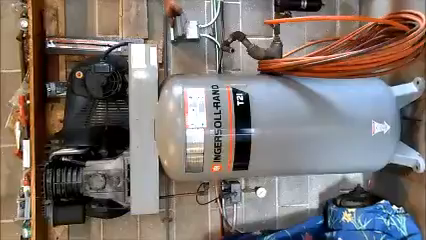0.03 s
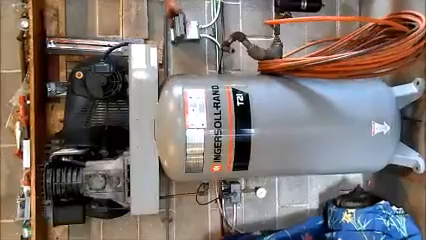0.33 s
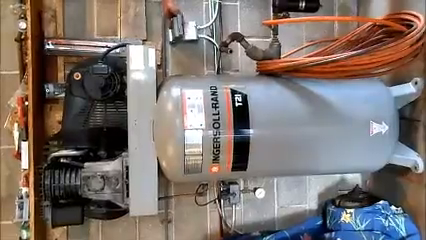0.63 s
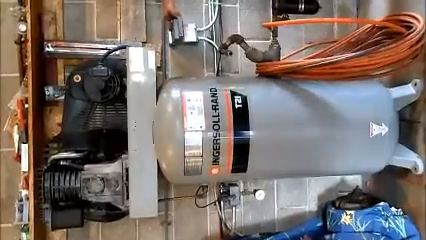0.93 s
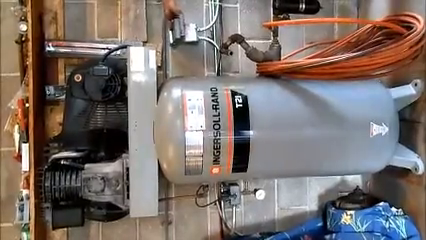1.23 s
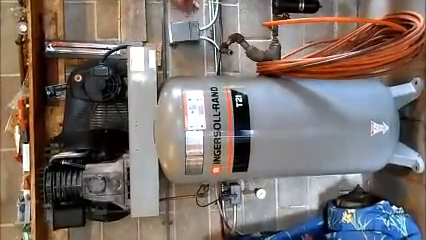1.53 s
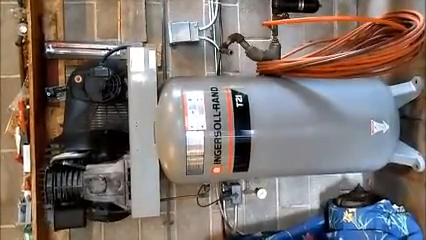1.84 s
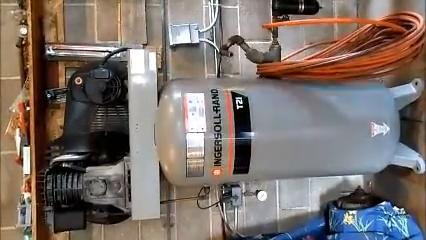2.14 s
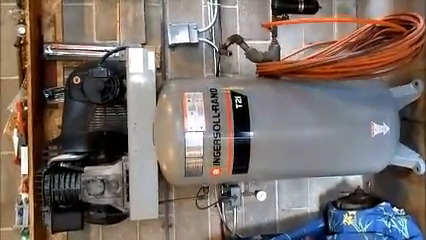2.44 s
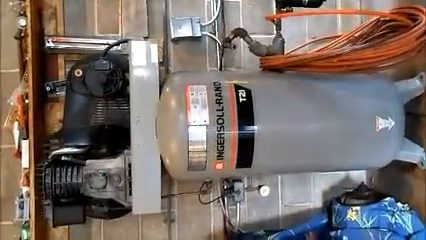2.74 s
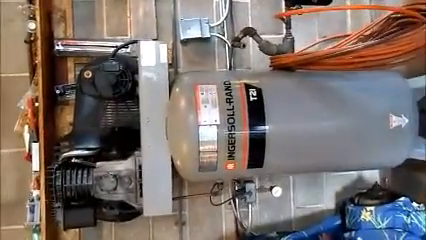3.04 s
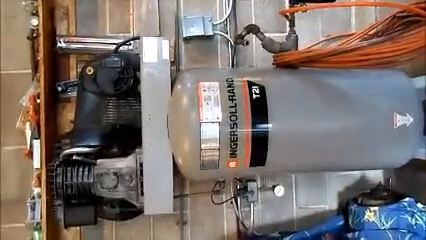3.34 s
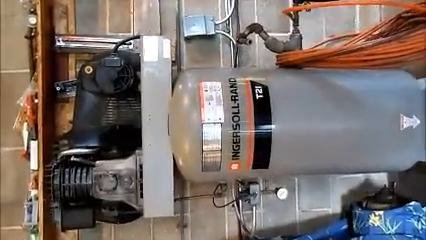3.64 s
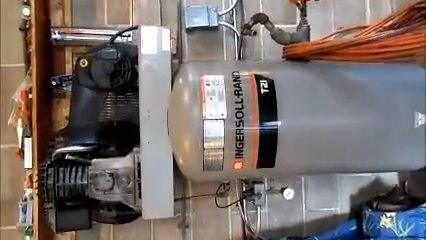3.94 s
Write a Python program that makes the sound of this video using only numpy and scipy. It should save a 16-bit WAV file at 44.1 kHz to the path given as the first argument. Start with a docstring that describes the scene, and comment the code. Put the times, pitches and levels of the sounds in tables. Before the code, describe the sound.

An air compressor kicks in after near silence and a sharp switch clack in a small workshop. A metal lid drops shut and bounces once while the machine runs on with a steady rumble, fast thumping and rattling hiss.

```python
"""A belt-driven piston air compressor starts up in a small workshop.
A hand fumbles at the switch box, the switch clacks, and motor and belt groan as they take the load.
The pump settles to about twenty turns a second: pistons thump, valves puff, parts clatter, air rushes
and the tank rings over the motor's hum. The metal lid of the switch box drops shut and bounces once."""
import sys
import numpy as np
from scipy import signal
from scipy.fft import rfft, irfft
from scipy.io import wavfile
from scipy.ndimage import uniform_filter1d

SR = 44100
rng = np.random.default_rng(int(sys.argv[2]) if len(sys.argv) > 2 else 0)


def to_wav(s):
    """Save 16-bit WAV."""
    ch = np.atleast_2d(s).T  # columns
    pcm = np.round(np.clip(ch, -1, 1) * 32767)  # PCM
    wavfile.write(sys.argv[1], SR, pcm.astype(np.int16))


N = 176400
T = np.arange(N) / SR
CRANK_HZ, MAINS_HZ = 19.725, 60  # turns of the pump's crank; cycles of the electric supply
OPEN_S = 0.44  # near silence until here


def pump(turns, on_s=1.234):
    """All the sounds of the pump fade in together; turns counts the turns of its crank."""
    parts = clatter() + air_rush(turns) + tank() + thump(turns) + valves(turns)
    return ramp(on_s, 0.07) * parts


def thump(turns):
    """The pistons push out pulses of pressure: low tones at multiples of the crank rate."""
    tones = [(1, -30), (2, -25.5), (4, -28), (5, -36.5), (6, -28.5), (7, -28.5), (8, -26.5), (9, -29.5),
             (10, -29.5), (11, -31.5), (13, -31.5), (14, -36.5), (15, -34), (16, -38.5), (17, -39.5),
             (32, -39), (35, -42.5)]  # tones in the pulses: crank_multiple, level_db
    loudness = [(1.35, 1.5), (1.85, -2.5), (2.15, 0.5), (2.95, -0.5), (3.32, 1.3), (3.55, -0.5),
                (3.95, 0.5)]  # strength of the pulses: time_s, level_db
    out = np.zeros(N)
    for multiple, db in tones:
        strength = amp(db) * (1 + 0.088 * wander(rate_hz=5.4))
        smear = 1.13 * rng.uniform(-np.pi / 2, np.pi / 2)  # tank and room put the tones out of step
        out += strength * np.sqrt(2) * np.cos(2 * np.pi * multiple * turns + smear)
    return level(loudness) * out


def valves(turns, fall_hz_per_s=6700):
    """Each valve rings or puffs at its own place in the turn, never twice equally hard."""
    # clean rings of the air intake: delay_s, length_s, pitch_hz, level_db
    rings = [(0.0042, 0.0024, 1166, -22.5), (0.009, 0.0035, 1140, -32), (.017, 0.0054, 1033, -28)]
    # rough puffs of the valves: delay_s, length_s, pitch_hz, width_hz, level_db
    puffs = [(0.01, 0.0043, 460, 340, -35), (0.032, 0.014, 696, 130, -37.5),
             (0.0078, 0.0088, 1700, 1100, -38), (0.0093, 0.0043, 8920, 1100, -53.5),
             (0.043, 0.0092, 5800, 6200, -49.5)]
    unloaded = 1 - ramp(1.31, 0.16)  # the intake gulps harder until the pump works against pressure
    out = np.zeros(N)
    for delay, length, hz, db in rings:
        t = since(turns, delay)
        strength = amp(db + 5 * unloaded + 1.43 * wander(rate_hz=35))
        phase = 2 * np.pi * (hz - fall_hz_per_s * t / 2) * t + 0.35 * wander(rate_hz=120)
        out += strength * pulse(turns, delay, length) * np.sqrt(2) * np.cos(phase)
    for delay, length, hz, width_hz, db in puffs:
        puff = machine_noise(repeat=0.79) * pulse(turns, delay, length)
        out += amp(db) * band(puff, hz, width_hz)
    knocks = band(noise() * pulse(turns, delay_s=0, length_s=0.005), hz=480, width_hz=350)
    return out + amp(-28) * unloaded * knocks


def clatter():
    """Pump and belt clatter steadily, much alike in every turn."""
    spectrum = [(20, -12), (130, 0.5), (240, -3.5), (340, -4), (490, -0.5), (660, -3.5), (800, -8),
                (1300, -7.5), (1600, -21), (3000, -37.5)]  # tone of the clatter: pitch_hz, level_db
    return amp(-25.5) * colour(machine_noise(repeat=0.56), spectrum)


def air_rush(turns, ring_share=0.61):
    """Air rushes from the pump and rings in the room, and swells once a turn, so it rattles."""
    spectrum = [(820, -36), (1400, -0.5), (1900, 1), (2400, -2), (3050, 0), (3740, -7.5), (4550, -4.5),
                (4950, -10), (5330, -8), (6200, -19.5), (7740, -17), (8290, -21.5), (9030, -23.5),
                (10100, -21), (10800, -57)]  # tone of the rushing air: pitch_hz, level_db
    loudness = [(1.2, -24), (1.3, -34), (1.42, -38.5), (1.55, -32.5), (1.7, -32.5), (1.9, -32.5),
                (2.1, -29), (2.5, -30.5), (2.9, -31), (3.2, -28.5), (3.45, -31.5), (3.65, -27.5),
                (3.8, -31.5), (4, -30.5)]  # strength of the rush: time_s, level_db
    ring = echoes(noise())
    rough = unit(machine_noise(repeat=0.17) * amp(1.9 * wander(rate_hz=340)))
    rush = np.sqrt(ring_share) * ring + np.sqrt(1 - ring_share) * rough
    swell_db = 3.5 * pulse(turns, delay_s=0.04, length_s=0.015)
    rattle = unit(amp(swell_db + 0.58 * wander(rate_hz=32)))
    return level(loudness) * rattle * colour(rush, spectrum)


def tank(pitch_hz=520.5):
    """The air tank rings on one wavering note."""
    loudness = [(1.3, -35.5), (2.25, -39.5), (2.55, -28.5), (2.85, -29.5), (3.05, -35), (3.3, -33),
                (3.6, -30.5), (4, -33)]  # strength of the ring: time_s, level_db
    tone = np.sqrt(2) * np.sin(2 * np.pi * pitch_hz * T + 0.13 * wander(rate_hz=5.9))
    flutter = amp(-0.5 + 2.4 * wander(rate_hz=24))
    return level(loudness) * tone * flutter


def motor(turns, start_s=1.235, settle_s=1.445):
    """The starting current makes a ragged buzz, which gives way to a hum that throbs with the load."""
    tones = [(1, -31, 0.06), (2, -30, 0.18), (3, -32.5, 0.27), (4, -21.5, 0.36)]  # tones of the motor's hum: mains_multiple, level_db, throb_share
    running = ramp(settle_s, 0.086)
    mains_phase = 2 * np.pi * MAINS_HZ * (T - start_s)
    load = np.cos(2 * np.pi * (turns - 0.65))
    hum = np.zeros(N)
    for multiple, db, throb in tones:
        tone = np.sqrt(2) * np.sin(multiple * mains_phase + 0.05 * wander(rate_hz=23))
        hum += amp(db) * tone * (1 + throb * load)
    growl = 1 + 0.3 * wander(rate_hz=170)
    surge = amp(-20) * np.sqrt(2) * np.sin(2 * mains_phase) * growl
    return ramp(start_s, 0.014) * (hum * (0.25 + 0.71 * running) + surge * (1 - running))


def groans():
    """Motor and belt shudder as they take up the load; each groan swells and dies away."""
    # groans of motor and belt: start_s, rise_s, fade_s, pitch_hz, width_hz, level_db
    shudders = [(1.160, 0.03, 0.15, 252, 24, -11.5), (1.163, 0.049, 0.14, 572, 210, -13.5),
                (1.163, 0.011, 0.72, 403, 147, -17.5), (1.18, 0.031, 0.27, 1130, 400, -20.5),
                (1.17, 0.029, 0.4, 2300, 1700, -20.5), (1.158, 0.087, 0.35, 167, 210, -15.5),
                (1.16, 0.18, .25, 60, 14, -26)]
    out = np.zeros(N)
    for start, rise, fade, hz, width_hz, db in shudders:
        faded_db = 60 * np.maximum(T - start - rise, 0) / fade
        out += amp(db - faded_db) * ramp(start, rise) * rough_tone(hz, width_hz)
    return out


def switch():
    """A hand touches the box, then switch and starter clack sharply, with a tail from the room."""
    # touches of the hand: start_s, level_db, pitch_hz, width_hz, fade_s
    touches = [(0.732, -45, 701, 50, 0.15), (.729, -51.5, 1328, 160, 0.08), (.975, -49, 720, 350, .15),
               (1.104, -51.5, 1800, 1800, 0.2), (1.137, -38, 3300, 3020, 0.16),
               (1.145, -22.5, 3480, 920, 0.085), (1.145, -30, 5800, 1510, .08)]
    clacks = [(1.153, -11.5), (1.197, -24), (1.272, -25), (1.562, -30.5)]  # blows of switch and starter: start_s, level_db
    spectrum = [(200, -11), (700, 0), (1070, 9.5), (1500, -1), (3500, 0.5), (4500, -2.5), (5600, -2),
                (7700, -1.5), (10500, -9)]  # tone of a clack: pitch_hz, level_db
    hand = sum(amp(db) * strike(start, fade, rise_s=0.0032) * rough_tone(hz, width_hz)
               for start, db, hz, width_hz, fade in touches)
    blows = np.zeros(N)
    for start, db in clacks:
        tail = amp(-8) * strike(start, fade_s=0.27)
        blows += amp(db) * (strike(start, fade_s=0.063, rise_s=0.007) + tail)
    return hand + blows * colour(noise(), spectrum)


def lid():
    """The metal lid cracks against its box and rings unevenly; the room answers."""
    hits = [(1.702, -2), (1.979, -17)]  # the drop and the bounce: start_s, level_db
    notes = [(1280, -3.5, 0.16), (1350, 2, 0.15), (2089, -12, 0.2), (2280, -1.5, 0.085), (2385, -2, 0.21),
             (2955, -9, 0.17), (3720, -6, .07), (3790, -5, 0.17), (4440, -15, 0.39), (5480, -19, 0.22),
             (6550, -14, 0.074), (7154, -24, 0.22), (9800, -14, 0.11)]  # notes the lid rings at: pitch_hz, level_db, fade_s
    # tone of the crack: pitch_hz, level_db
    spectrum = [(700, -15), (1300, 6), (3800, 1), (6500, -2.5), (10500, -12)]
    out = np.zeros(N)
    for start, db in hits:
        ring = np.zeros(N)
        for hz, note_db, fade in notes:
            tone = np.sin(2 * np.pi * hz * T + 1.23 * wander(rate_hz=47))
            ring += amp(note_db) * strike(start, fade, rise_s=0.0036) * tone
        crack = strike(start, fade_s=0.27, rise_s=0.0035) * colour(noise(), spectrum)
        out += amp(db) * (amp(-5.5) * ring + amp(-12.5) * crack)
    return out + amp(-9) * echoes(out)


def room_tone():
    """The workshop's faint rumble and hiss, with a soft bump as it comes in."""
    spectrum = [(15, -30), (25, 7), (256, -7.5), (457, -10), (703, -11), (952, -16), (1320, -15.5),
                (1460, -17), (10500, -29.5), (13600, -53), (22000, -120)]  # tone of the quiet room: pitch_hz, level_db
    bump = 1 + 0.52 * strike(OPEN_S, fade_s=0.3)
    return amp(-54) * colour(noise(), spectrum) * bump


def echoes(x, fade_s=0.2):
    """Many close reflections make x ring at many pitches, at about the same power."""
    tail = (noise() * amp(-60 * T / fade_s))[:SR // 2]
    return signal.fftconvolve(x, tail / np.linalg.norm(tail))[:N]


def amp(db):
    """Turns decibels into a gain."""
    return 10 ** (np.asarray(db) / 20)


def unit(x):
    """Scales x to an average power of 1."""
    return x / np.sqrt(np.mean(x ** 2) + 1e-20)


def level(points):
    """A gain that follows points of (time_s, level_db)."""
    return amp(np.interp(T, *np.transpose(points)))


def ramp(start_s, length_s):
    """Rises from 0 to 1."""
    return np.clip((T - start_s) / length_s, 0, 1)


def strike(start_s, fade_s, rise_s=0.0018):
    """Rises quickly and dies away by 60 dB in fade_s."""
    return ramp(start_s, rise_s) * amp(-60 * np.maximum(T - start_s, 0) / fade_s)


def since(turns, delay_s):
    """Seconds from the nearest moment that lies delay_s after an intake stroke."""
    return ((turns - delay_s * CRANK_HZ + 0.5) % 1 - 0.5) / CRANK_HZ


def pulse(turns, delay_s, length_s):
    """A smooth swell in every turn, down to about 60% at length_s either side of its peak."""
    return np.exp(-0.5 * (since(turns, delay_s) / length_s) ** 2)


def colour(x, points):
    """Shapes the tone of x by points of (pitch_hz, level_db), then scales to power 1."""
    hz, db = np.transpose(points)
    freqs = np.fft.rfftfreq(N, 1 / SR)
    gain = amp(np.interp(np.log(freqs + 1), np.log(hz + 1), db))
    return unit(irfft(rfft(x) * gain, N))


def band(x, hz, width_hz):
    """Keeps the part of x near one pitch, at power 1."""
    freqs = np.fft.rfftfreq(N, 1 / SR)
    return unit(irfft(rfft(x) / (1 + ((freqs - hz) / width_hz * 2) ** 4), N))


def noise():
    """White noise: an even hiss."""
    return rng.standard_normal(N)


def machine_noise(repeat):
    """Noise of which the share `repeat` comes back alike in every turn."""
    place_in_turn = (T % (1 / CRANK_HZ) * SR).astype(int)
    return np.sqrt(repeat) * noise()[place_in_turn] + np.sqrt(1 - repeat) * noise()


def wander(rate_hz):
    """A smooth random drift, at power 1."""
    return band(noise(), 0, rate_hz)


def rough_tone(hz, width_hz):
    """A tone of even strength whose pitch strays around hz."""
    phase = np.angle(signal.hilbert(band(noise(), hz, width_hz)))
    return np.sqrt(2) * np.cos(phase)


def scene():
    """Compressor, switch box and the quiet of the workshop, in mono."""
    turns = (T - 1.3354) * CRANK_HZ  # a whole number at each intake stroke
    return (pump(turns) + motor(turns) + groans() + switch() + lid() + room_tone())[None]


def record(dry, limit_db=-11, recover_db_per_s=16, ceiling=0.64, top_hz=10750):
    """The sound comes in; gain control turns it down after loud blows; peaks and top treble are cut."""
    x = dry[0] * (amp(-44) + ramp(OPEN_S, 0.002))
    power_db = 10 * np.log10(abs(uniform_filter1d(x ** 2, size=600)) + 1e-12)
    recovery_db = T * recover_db_per_s
    held_db = np.maximum.accumulate(power_db + recovery_db) - recovery_db  # jumps up, sinks slowly
    over_db = np.maximum(held_db - limit_db, 0)
    x = x / amp(uniform_filter1d(over_db, size=200))
    rounded = x / (1 + (x / ceiling) ** 8) ** (1 / 8)
    treble_cut = signal.firwin(301, top_hz, window=("kaiser", 8), fs=SR)
    return signal.oaconvolve(rounded, treble_cut, "same")[None]


dry = scene()
out = record(dry)
to_wav(out)
```